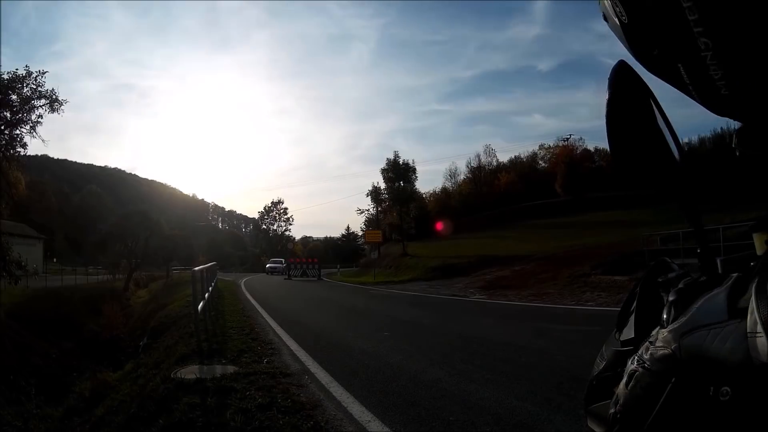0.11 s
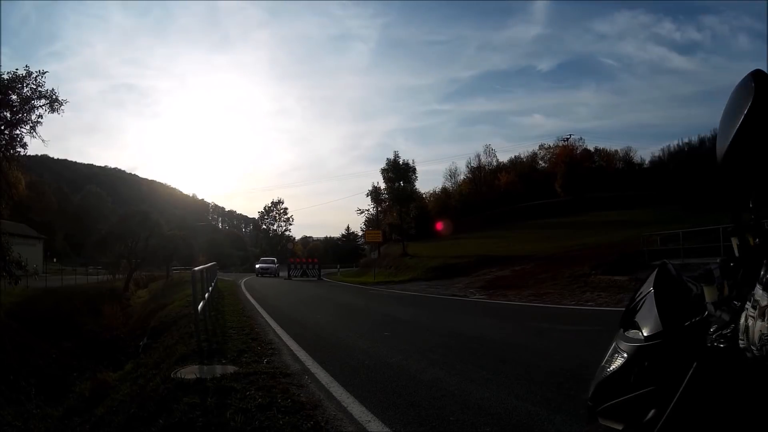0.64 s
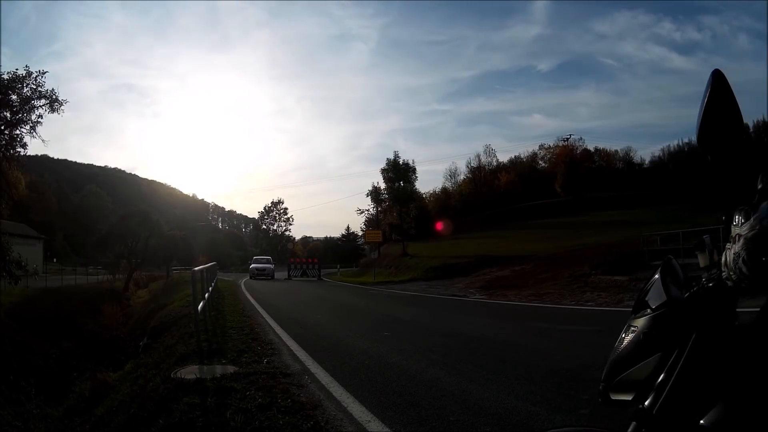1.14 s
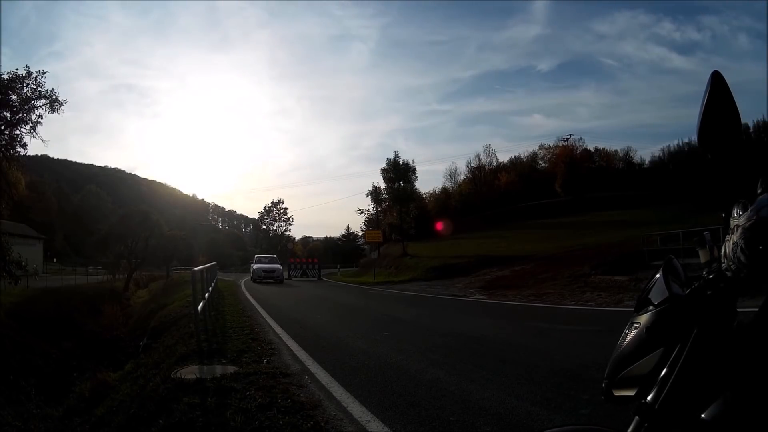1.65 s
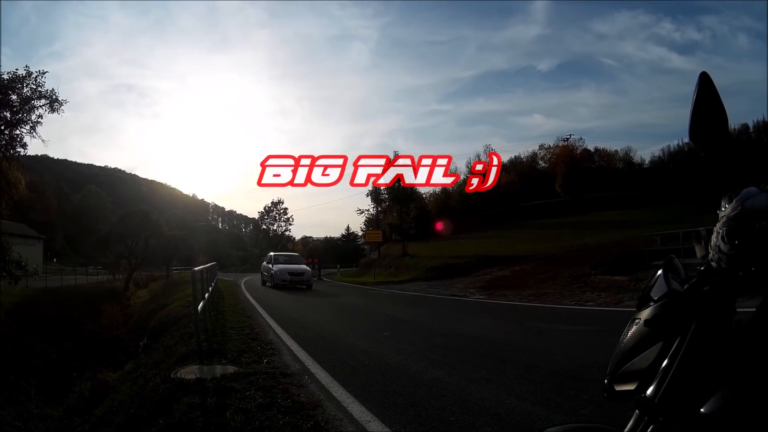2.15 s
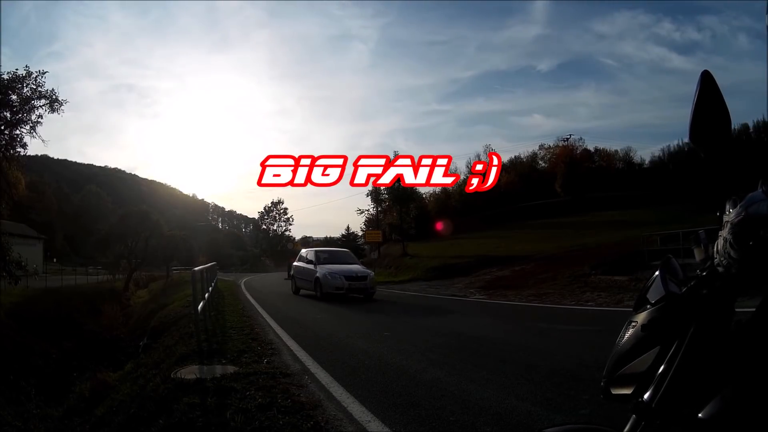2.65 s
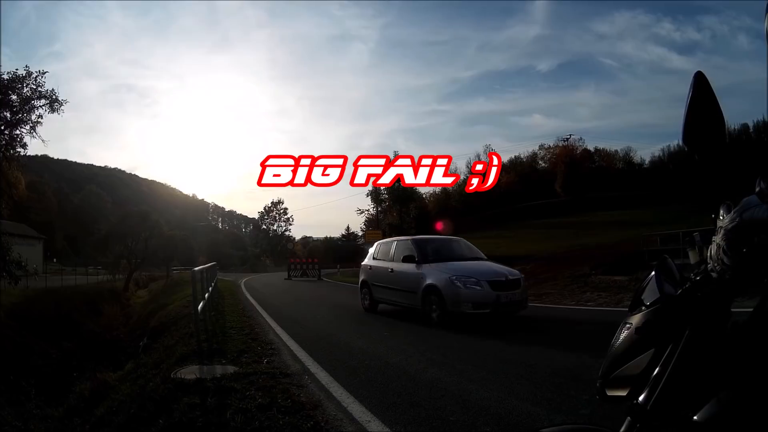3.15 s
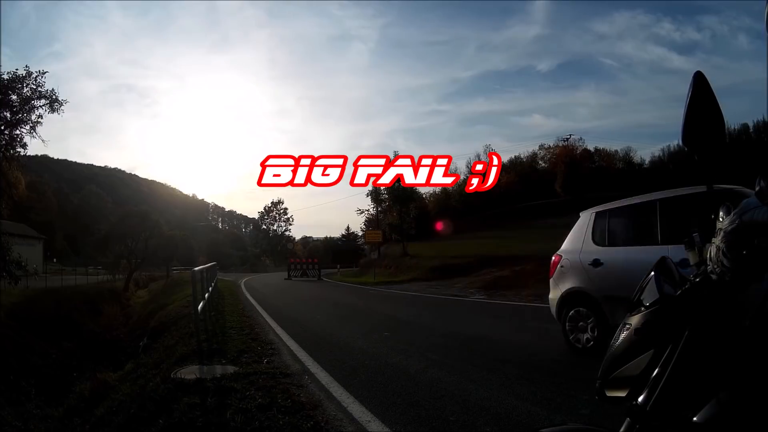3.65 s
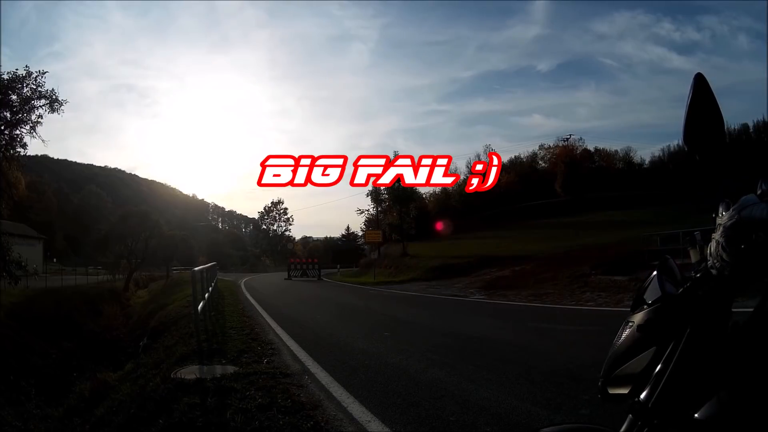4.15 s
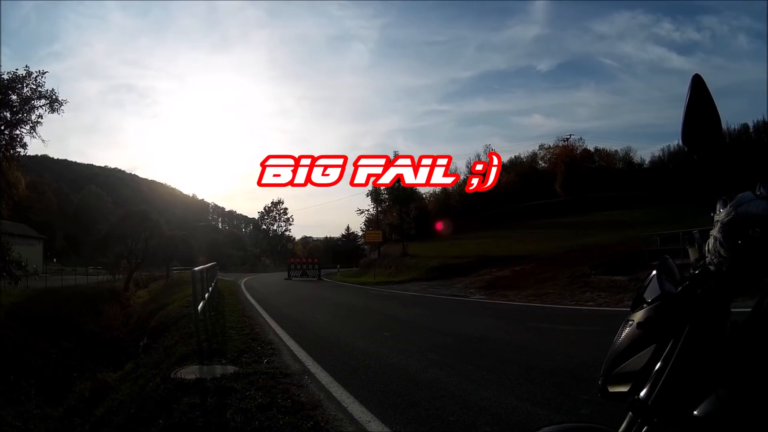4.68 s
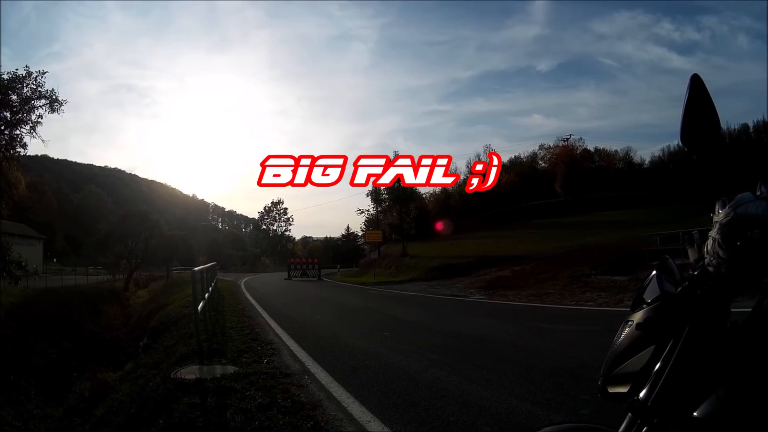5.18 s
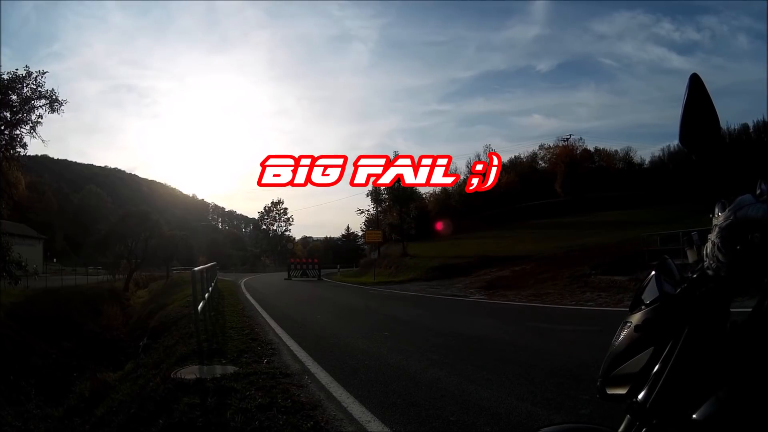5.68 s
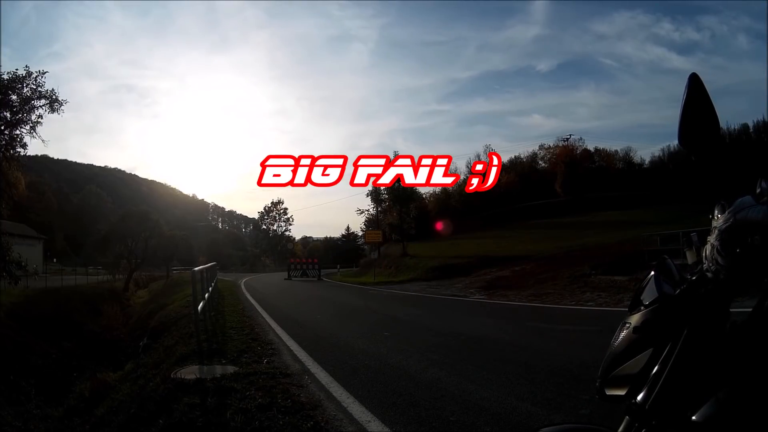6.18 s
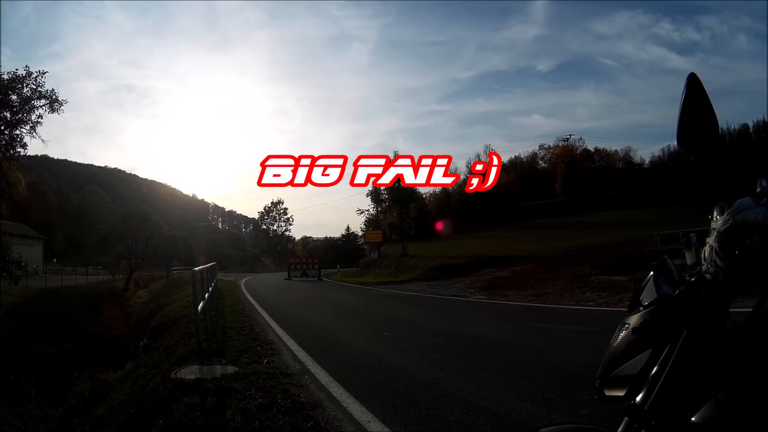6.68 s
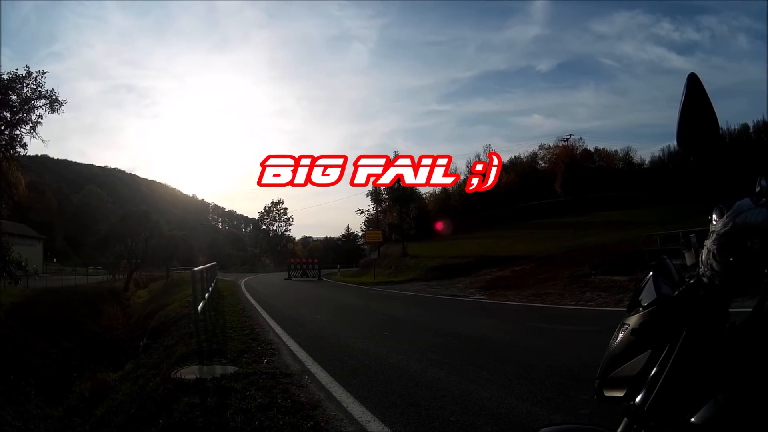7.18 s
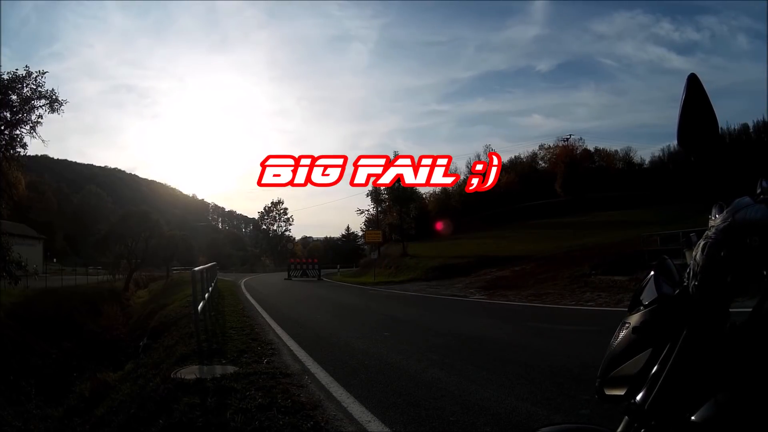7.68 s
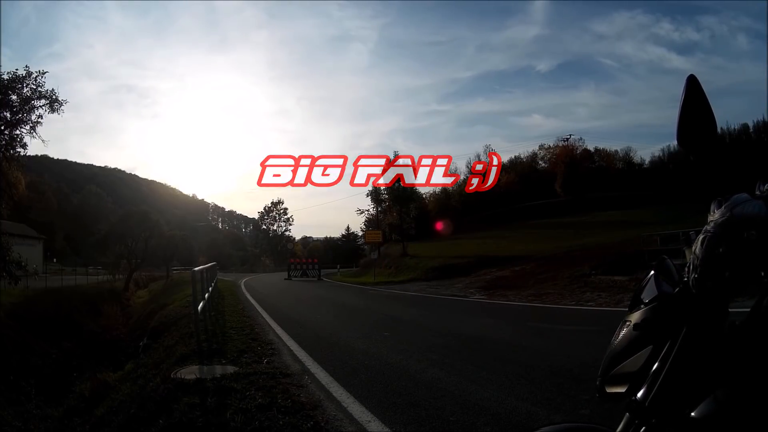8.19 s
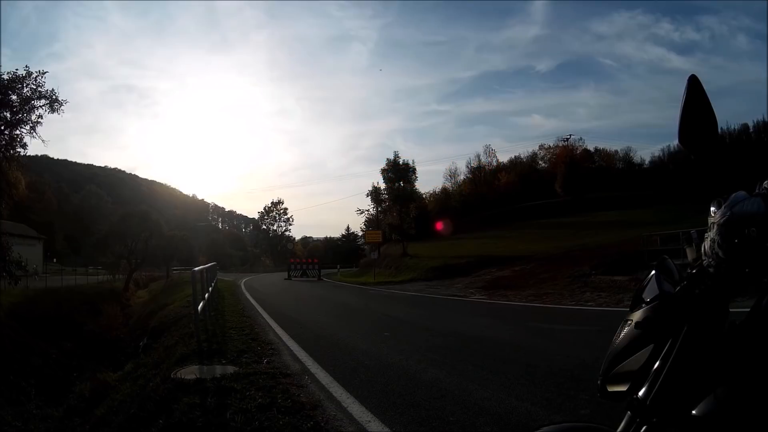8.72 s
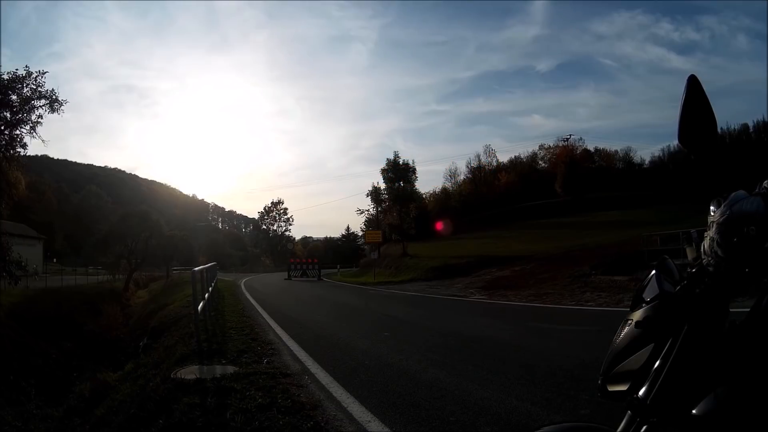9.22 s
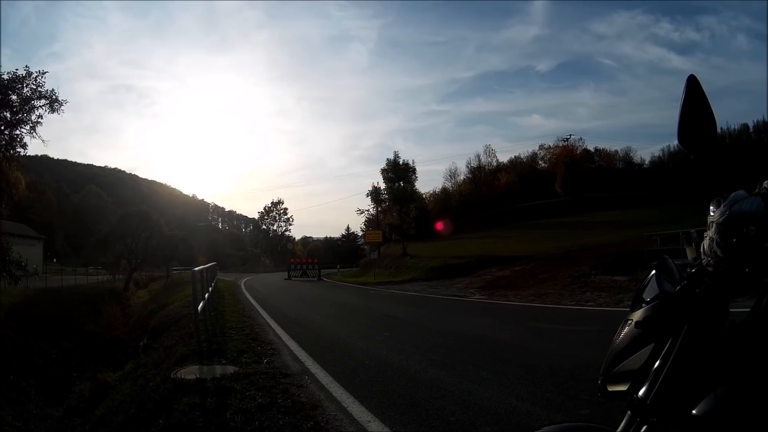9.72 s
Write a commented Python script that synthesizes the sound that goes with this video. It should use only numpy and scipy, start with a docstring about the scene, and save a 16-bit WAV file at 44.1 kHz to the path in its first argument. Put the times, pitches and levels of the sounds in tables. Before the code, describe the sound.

Lumpy four-cylinder bike idle dies with a hard metallic clunk, a car whooshes by, another clunk, then two laboured bursts of starter cranking.

```python
"""A four-cylinder motorcycle idles with misfires, each firing ringing the pipe under valve clatter, then stalls.
Gearbox blows ring metal modes over noise cracks as it clunks into gear and is kicked back.
The starter, pressed twice, grinds its teeth into the casing on each compression and coasts between; air chuffs
down the pipe, and one firing catches. A car passes in tyre noise and engine orders over far traffic and air.
The camera on the bike adds hiss and a thin whine, and rounds off the hardest blows."""
import sys
import numpy as np
from scipy import signal
from scipy.fft import rfft, irfft
from scipy.io import wavfile
from scipy.ndimage import uniform_filter1d

SR = 44100
rng = np.random.default_rng(int(sys.argv[2]) if len(sys.argv) > 2 else 0)


def dump_mix(stems):
    """Bounce the given channels to the path in sys.argv[1] as a 16-bit WAV at rate SR."""
    frames = np.atleast_2d(stems).T  # one column per channel
    limited = np.clip(frames, -1, 1)  # hard clip at full scale
    pcm = np.round(limited * 32767).astype(np.int16)
    wavfile.write(sys.argv[1], SR, pcm)


def gain_from_decibels(decibels):
    """Convert decibel values to linear amplitude factors."""
    exponent = np.asarray(decibels, float) / 20
    return 10 ** exponent


N = 433944
T = np.arange(N) / SR


def noise():
    """White noise of the scene's length."""
    return rng.standard_normal(N)


def curve(rows):
    """Columns of a table as sample-rate curves."""
    s, *columns = np.transpose(rows)
    return [np.interp(T, s, c) for c in columns]


def unit(x):
    """Scale to rms 1."""
    return x / np.sqrt(np.mean(x ** 2))


def colour(x, points):
    """Shape a spectrum by (frequency [Hz], gain [dB]) points."""
    hz, db = np.transpose(points)
    f = np.maximum(np.fft.rfftfreq(len(x), 1 / SR), 1)
    gain = gain_from_decibels(np.interp(np.log(f), np.log(hz), db))
    return irfft(rfft(x) * gain, len(x))


def ring(x, modes):
    """Sum of decaying modes struck by x; neighbouring modes move in opposite sense."""
    out = 0
    for k, (hz, db, t60) in enumerate(modes):
        pole = np.exp(2j * np.pi * hz / SR - np.log(1000) / (t60 * SR))
        out = out + (-1) ** k * gain_from_decibels(db) * signal.lfilter([1], [1, -pole], x).imag
    return out


def sliding(x, hz, width):
    """A mode of the given width [Hz] whose pitch is a curve [Hz]."""
    turn = np.exp(2j * np.pi * np.cumsum(hz) / SR)
    return (turn * signal.lfilter([width], [1, -np.exp(-2.7 * width / SR)], x / turn)).imag


def walk(rate):
    """Smooth random wander of spread 1, with a new target level rate times a second."""
    k = int(SR / rate)
    levels = rng.standard_normal(4096)
    steps = levels[np.arange(N) // k]
    return unit(uniform_filter1d(uniform_filter1d(steps, k), k))


def push(x, seconds):
    """Soften clicks to a push of the given length."""
    return signal.fftconvolve(x, np.hanning(int(seconds * SR) + 3))[:len(x)]


# spectrum of the far bed: (frequency [Hz], gain [dB])
VALLEY_SPECTRUM = [(25, -10), (90, 1), (130, -6.5), (260, -2.5), (430, -8), (700, -9.5), (1200, -6),
                   (2320, -17.5), (3200, -29.5), (4500, -37)]
# its loudness: (time [s], level [dB])
VALLEY_LEVEL = [(7.3, -53), (7.85, -53), (8.1, -54), (8.62, -58)]


def valley():
    """Far traffic and air: coloured noise with a slow wander in level."""
    return gain_from_decibels(curve(VALLEY_LEVEL)[0] + 0.71 * walk(5)) * unit(colour(noise(), VALLEY_SPECTRUM))


# tyre roar spectrum: (frequency [Hz], gain [dB per Hz])
TYRE_SPECTRUM = [(70, -14), (170, -13), (270, -4), (430, -4), (850, -3), (1200, 0.5), (1700, -4.5),
                 (2320, -10.5), (2800, -18), (3200, -24), (3650, -30), (4800, -56), (6200, -64)]
# tyre roar as the car passes: (time [s], level [dB], treble tilt [dB per octave])
CAR_PASS = [(0, -54, 13), (2.1, -38, -0.5), (2.6, -34.5, 0), (2.9, -32.5, 0), (3.17, -30, .5),
            (3.36, -29, 0), (3.58, -29.5, -0.5), (3.81, -34.5, -3.5), (4.05, -31.5, -1),
            (4.33, -31.5, -0.5), (4.62, -33.5, -1), (5.14, -45.5, -2), (5.6, -37.5, 4.5), (7.3, -69, -7)]


def tyre_roar():
    """Six overlapping octaves of road noise, tilted about 1 kHz as the car's angle changes."""
    level_db, tilt_db = curve(CAR_PASS)
    scale, roar = colour(noise(), TYRE_SPECTRUM).std(), 0
    for hz in 100 * 2. ** np.arange(6):
        octave = [(hz / 4, -40), (hz / 2, -9), (hz / 1.4, -3), (hz, -1),
                  (hz * 1.4, -3), (hz * 2, -9), (hz * 4, -40)]
        band = colour(colour(noise(), TYRE_SPECTRUM), octave)
        roar = roar + gain_from_decibels(tilt_db * np.log2(hz / 1000) + 0.1 * walk(4.4)) * band / scale
    return gain_from_decibels(level_db) * roar


# air pumped in the tread grooves: (frequency [Hz], width [Hz], level [dB])
TREAD_MODES = [(1136, 160, -1.5), (1400, 87, -5)]
# tread notes against the roar: (time [s], level [dB])
TREAD_LEVEL = [(2.1, -5.5), (2.8, -4.5), (3.5, -5.5), (3.8, -12), (4.2, -17), (4.7, -14)]


def tread_notes():
    """Air pumped in the tread grooves: noise rings two modes that flicker apart."""
    out = 0
    for hz, width, db in TREAD_MODES:
        band = unit(ring(push(noise(), 0.00036), [(hz, 0, 4.0 / width)]))
        out = out + gain_from_decibels(db + curve(TREAD_LEVEL)[0] + 3.2 * walk(9.8)) * band
    return gain_from_decibels(curve(CAR_PASS)[0]) * out


# car engine's lowest order, gathering speed when past: (time [s], frequency [Hz])
CAR_ENGINE_HZ = [(4, 34.7), (5, 35.9), (6, 36.5)]
# orders 1-3: (loudest time [s], level [dB], rise [dB per s], fall [dB per s])
ENGINE_ORDERS = [(3.8, -47, 7, 30), (4, -40.5, 36, 18), (3.9, -42, 16, 8.2)]


def car_engine():
    """The three lowest engine orders as sines, each swelling to its own peak."""
    phase = 2 * np.pi * np.cumsum(curve(CAR_ENGINE_HZ)[0]) / SR
    hum = 0
    for order, (s, db, rise, fall) in enumerate(ENGINE_ORDERS, 1):
        level_db = db + np.minimum(rise * (T - s), fall * (s - T)) + 1.1 * walk(9.2)
        hum = hum + np.sqrt(2) * gain_from_decibels(level_db) * np.sin(order * phase)
    return hum


# thin top of the tyre noise: (frequency [Hz], gain [dB per Hz])
SIZZLE_SPECTRUM = [(3000, -24), (3700, -0.5), (4050, 2.5), (4700, -14), (6200, -26)]
# brighter top heard from behind the car: (frequency [Hz], gain [dB per Hz])
WAKE_SPECTRUM = [(3300, -20), (4200, -2), (5300, 0), (5900, -12.5), (7000, -29)]
# the two tops: (time [s], sizzle level [dB], wake level [dB])
SIZZLE_LEVELS = [(1.5, -90, -95), (2.15, -67, -83), (2.83, -65.5, -80), (3.45, -56, -69), (3.8, -66, -77),
                 (4, -72, -66.5), (4.35, -70, -72), (5.2, -90.5, -88)]


def car():
    """The passing car: tyre roar, tread notes, engine orders and two thin bands of tyre treble."""
    sizzle_db, wake_db = curve(SIZZLE_LEVELS)
    sizzle = gain_from_decibels(sizzle_db) * unit(colour(noise(), SIZZLE_SPECTRUM))
    wake = gain_from_decibels(wake_db) * unit(colour(noise(), WAKE_SPECTRUM))
    return tyre_roar() + tread_notes() + car_engine() + sizzle + wake


# starter under load, one row a compression:
# (time [s], take-up level [dB], length [s], level of air pushed down the pipe [dB])
LOADS_ROWS = [(5.189, -31.5, .065, -66), (5.256, -27, .2, -43), (5.51, -23, .095, -41),
              (5.659, -22, .085, -43), (5.795, -24.5, .095, -40), (5.946, -23, .1, -46),
              (6.111, -23.5, .09, -49), (6.258, -24.5, .085, -53), (6.406, -24, .1, -46),
              (6.565, -23, .108, -37), (6.728, -24, .103, -44), (6.88, -22, .068, -36),
              (6.977, -35.5, .06, -64.5), (8.691, -29.5, .065, -62), (8.795, -23, 0.11, -51),
              (8.898, -30.5, .065, -46.5), (9.023, -29, .095, -45), (9.177, -27.5, .08, -43),
              (9.318, -25, 0.095, -41), (9.468, -29.5, .11, -42), (9.692, -22.5, .06, -37),
              (9.807, -24.5, 0.18, -52)]
# exhaust pipe modes: (frequency [Hz], level [dB], t60 [s])
PIPE_MODES = [(46.2, -6.5, 0.31), (94.8, 4.5, 0.21), (166.7, 4.5, 0.02), (206, -8.5, 0.15),
              (310, -29, 0.048)]


def chuffs():
    """Unburnt air, pushed out slowly on each load, rings the pipe softly."""
    s, _, length, db = np.transpose(LOADS_ROWS)
    leaves_s = s + 0.37 * length  # share of the load that passes before the air leaves
    air = np.zeros(N)
    air[np.minimum(leaves_s * SR, N - 1).astype(int)] = gain_from_decibels(db)
    out = ring(push(air, 0.013), PIPE_MODES)
    return out * air.max() / abs(out).max()


# starter button: (time down [s], time up [s], free-spin drive level [dB])
BUTTON_PRESSES = [(5.148, 7.05, -39), (8.647, 10, -41.5)]


def presses():
    """Level of the starter's free spin: the pinion slams in, holds, then falls to a whirr that stops."""
    engage_s, engage_db, engage_fade_s = 0.018, 8, 0.045
    rundown_db_s, rundown_floor_db, rundown_s = 125, -18, 0.234
    out = np.zeros(N)
    for down, up, db in BUTTON_PRESSES:
        t, after = np.maximum(T - down, 0), np.maximum(T - up, 0)
        slam_db = engage_db * np.exp(-t / engage_fade_s)
        rundown_db = np.maximum(-rundown_db_s * after, rundown_floor_db)
        stop = np.clip((rundown_s - after) / 0.015 + 1, 0, 1)
        out += gain_from_decibels(db + slam_db + rundown_db) * np.minimum(t / engage_s, 1) ** 2 * stop
    return out


# first loads, whose teeth mesh evenly and sing: (start tooth rate [Hz], end tooth rate [Hz], end level [dB])
EVEN_LOADS = [(680, 668, -30), (825, 292, -24.5)]
# nominal tooth rate of the other loads: (start [Hz], end [Hz])
TOOTH_RATES = (588.7, 392.5)


def compressions():
    """Each load pulses once an armature turn while its tooth rate slides; backlash knocks at take-up."""
    armature_hz, throb_db, settled_db = 46.9, 2.5, -26.5
    load, fresh = np.zeros(N), np.zeros(N)
    rate, rough = np.full(N, 500.), np.full(N, .45)  # tooth rate [Hz], unevenness 0-1
    for k, (s, db, length, _) in enumerate(LOADS_ROWS):
        pace = 1 + .06 * rng.standard_normal()
        even = k < len(EVEN_LOADS)
        if even:
            start_hz, end_hz, end_db = EVEN_LOADS[k]
        else:
            start_hz, end_hz = pace * np.array(TOOTH_RATES)
            end_db = settled_db
        on = (T >= s) & (T - s < length + .03)
        t, change_db = T[on] - s, end_db - db
        release = np.clip((length + .018 - t) / .032, 0, 1) ** 1.5
        knock = 0.25 * gain_from_decibels(-2 * max(change_db, 0)) * np.exp(-t / 0.024)
        throb = throb_db * np.cos(2 * np.pi * armature_hz * pace * (t - .008))
        level = gain_from_decibels(db + change_db * t / length + throb)
        load[on] = level * np.clip(t / 0.00367, 0, 1) * (release + knock)
        fresh[on] = np.exp(-t / 0.013)  # metal flecks are thickest at take-up
        rate[on] = start_hz + (end_hz - start_hz) * t / length
        rough[on] = .06 if even else .12
    return load, fresh, rate, rough


# brush note: (free-running frequency [Hz], share lost under load, then two harmonics against free spin [dB])
BRUSH_NOTE = (2000, .07, -11, -17)
# brush note grows clearer late in the second press: (time [s], gain [dB])
BRUSH_GAIN = [(7, 0), (9.1, 5), (9.55, 14)]


def brushes(load, coast):
    """The brushes sing a thin note that sags under load and climbs back when the motor runs free."""
    free_hz, lost, first_db, second_db = BRUSH_NOTE
    strain = np.clip(load / np.median(load[load > 0]), 0, 1)
    k = 1 / (.05 * SR)
    sag = signal.lfilter([k], [1, k - 1], strain)
    phase = 2 * np.pi * np.cumsum(free_hz * (1 - lost * sag + .002 * walk(60))) / SR
    note = gain_from_decibels(first_db) * np.sin(phase) + gain_from_decibels(second_db) * np.sin(2 * phase)
    return coast ** 2 / coast.max() * gain_from_decibels(curve(BRUSH_GAIN)[0] + 4.3 * walk(28)) * note


# short metal contact of a tooth: (frequency [Hz], gain [dB])
TOOTH_SPECTRUM = [(300, -41), (700, -13), (1400, -26.5), (2000, -2.5), (3000, -2), (16000, 6.5)]
# starter casing modes: (frequency [Hz], width [Hz], level [dB])
CASING_MODES = [(725, 71, 0.5), (1168, 60, -1.5), (1353, 47, -5.5), (1560, 114, -3), (1948, 73, 2),
                (2175, 127, -4), (2362, 68, 4), (2684, 160, -11.5), (3530, 50, -15), (3740, 120, -19),
                (4800, 89, -15.5), (5390, 120, -27.5), (7650, 170, -44.5)]
# grinding noise: (frequency [Hz], gain [dB per Hz])
GRIND_SPECTRUM = [(25, -7), (60, -16), (170, -14.5), (260, -4.5), (700, -0.5), (1300, 0), (2400, -11.5),
                  (2800, -9.5), (3200, -17.5), (4000, -17), (5000, -18.5), (5900, -35), (7000, -47.5),
                  (9000, -42.5), (12000, -50), (15500, -62)]
# chips of metal contact: (frequency [Hz], gain [dB per Hz])
FLECK_SPECTRUM = [(4500, -24), (6000, -10.5), (7500, 5), (8300, 2), (11000, -3.5), (15500, -28)]


def starter():
    """Gear teeth click into the casing, slowing through each load, with grind, metal flecks and brush note."""
    load, fresh, rate, rough = compressions()
    coast = presses()
    turns = np.cumsum(rate * (1 + .12 * rough * walk(300))) / SR
    clicks = np.diff(np.floor(turns), prepend=0) * gain_from_decibels(10 * rough * noise())
    teeth = unit(colour(clicks, TOOTH_SPECTRUM))
    loaded, free = gain_from_decibels(1.5 + 0.9 * walk(120)) * load, gain_from_decibels(2.2 * walk(45)) * coast

    def contact(free_gain):
        mesh = np.sqrt(1 - rough) * teeth + np.sqrt(rough) * noise()
        return loaded * mesh + free_gain * free * noise()

    force, rasp = contact(0.49), contact(1.31)
    chips = gain_from_decibels(6 * walk(400)) * noise() * (load * (0.068 + fresh) + free)
    casing = 0
    for k, (hz, width, db) in enumerate(CASING_MODES):
        # the point of contact moves and the strain changes, so each mode swells and slides alone
        struck = force * gain_from_decibels(1.8 * walk(14))
        casing = casing + (-1) ** k * gain_from_decibels(db) * sliding(struck, hz * (1 + .009 * walk(18)), width)
    # steady noise through the same colours sets the scale of each part
    probe = noise()
    still_modes = [(hz, db + 20 * np.log10(width), 1.85 / width) for hz, width, db in CASING_MODES]
    casing = gain_from_decibels(2.5) * casing / ring(probe, still_modes).std()
    grind = gain_from_decibels(-1.0) * colour(rasp, GRIND_SPECTRUM) / colour(probe, GRIND_SPECTRUM).std()
    flecks = gain_from_decibels(-36) * colour(chips, FLECK_SPECTRUM) / colour(probe, FLECK_SPECTRUM).std()
    return brushes(load, coast) + flecks + casing + grind


# blows in the gearbox and small ticks of levers:
# (time [s], ring peak level [dB], loudest frequency [Hz], t60 [s], noise crack against the ring [dB])
BLOWS = [(1.558, -6, 1120, 0.077, -5), (1.574, -20.5, 1160, 0.13, 1.5), (1.823, -19.5, 4300, 0.066, 5),
         (1.834, -7.5, 1100, 0.027, 1), (1.838, -8, 522, 0.034, -3), (1.862, -25, 900, .037, 6),
         (1.886, -16, 577, 0.055, -2), (1.893, -29, 1500, 0.02, 9), (1.916, -30, 900, 0.062, 3),
         (1.95, -27, 2400, 0.033, 5), (1.954, -20.5, 1220, 0.04, 1), (1.964, -25.5, 1000, 0.034, -8.5),
         (1.991, -23.5, 1900, 0.085, 0.5), (2.016, -24.5, 1130, 0.023, 5), (2.039, -34, 810, 0.028, 4),
         (2.068, -29.5, 670, 0.048, -1), (2.102, -46, 2400, 0.033, 7), (4.632, -6, 900, 0.075, -3),
         (4.639, -7.5, 1900, 0.019, -24), (4.677, -8, 1110, 0.036, -5.5), (4.681, -13, 1400, 0.067, -2),
         (4.695, -8.5, 1220, 0.058, -6.5), (4.718, -12.5, 1530, 0.032, -3.5),
         (4.723, -17.5, 775, 0.14, -12), (4.758, -23, 736, 0.03, -32.5), (7.714, -38, 1220, 0.028, -15),
         (7.76, -36.5, 950, 0.075, -7.5), (7.837, -43, 940, 0.062, -7), (7.899, -37, 900, 0.042, -14),
         (7.918, -48, 2400, 0.028, 0), (7.966, -42, 690, 0.18, -18), (8.118, -43.5, 1400, 0.12, 1),
         (8.289, -51.5, 1900, 0.11, 3.5), (8.356, -45, 1250, .026, -12)]
# gearbox modes: (frequency [Hz], level [dB], t60 [s])
GEARBOX_MODES = [(204, -1, 0.031), (389, 4, 0.014), (604, -6, 0.036), (732, -4.5, 0.046),
                 (900, -3.5, 0.028), (1139, -1.5, 0.019), (1260, -4, 0.032), (1400, -3, 0.025),
                 (1930, -3.5, 0.041), (2400, -19.5, 0.13), (3780, -27.5, .025), (4950, -30, .02),
                 (5430, -33, 0.014), (8100, -31, .025)]
# noise crack of a blow: (frequency [Hz], gain [dB per Hz])
CRACK_SPECTRUM = [(100, -19), (400, -3), (1200, -6), (2400, 0), (3200, -11), (4000, -7.5), (5400, -14.5),
                  (6500, -28.5), (9000, -27.5), (15500, -42)]


def clunks():
    """A short scrape rings the gearbox, most near the struck part, over a crack of noise."""
    out, t = np.zeros(N), T[:8192]
    for s, db, hz, t60, crack_db in BLOWS:
        scrape, crack = rng.standard_normal((2, len(t)))
        modes = [(f, g - 13.2 * abs(np.log2(f / hz)), d) for f, g, d in GEARBOX_MODES]
        # weaker blows crack duller above 6 kHz, harder ones brighter
        crack_colour = [(f, g + 0.2 * (db + 8) * (f > 6000)) for f, g in CRACK_SPECTRUM]
        fade = np.minimum(t / 0.00061, 1) * np.exp(-np.log(1000) * t / t60)
        body = ring(scrape * fade, modes)
        snap = colour(crack, crack_colour) * fade ** 1.1  # the crack dies sooner than the scrape
        i = int(s * SR)
        out[i:i + len(t)] += gain_from_decibels(db) * (body / abs(body).max() + gain_from_decibels(crack_db) * snap / abs(snap).max())
    return out


# crankshaft hunting around idle: (time [s], firing rate [firings per s])
IDLE_RATE = [(0.0, 36.6), (0.13, 38.4), (0.29, 41.2), (0.42, 39.8), (0.54, 39.7), (0.62, 38.6),
             (0.72, 40.9), (0.85, 41.1), (1.0, 40.0), (1.1, 41.2), (1.2, 40.5), (1.31, 41.2), (1.45, 40.0),
             (1.6, 38.6), (1.75, 40.4), (1.85, 41.8)]
FAILED_FIRINGS = [(.335, -5), (.411, -22), (.535, -4), (.611, -22), (.736, -8), (.932, -13), (1.007, -13),
                  (1.13, -15), (1.203, -7), (1.325, -12), (1.399, -24), (1.524, -12), (1.6, -16),
                  (1.728, -4)]
# strength of the four cylinders in turn: [dB]
CYLINDER_LEVELS = [-0.6, 0, -0.9, -0.7]


def firings():
    """One click a firing, its strength set by cylinder, chance and misfires."""
    turns = .33 + np.cumsum(curve(IDLE_RATE)[0]) / SR  # .33 of an interval is already turned
    count = turns.astype(int)
    at = np.flatnonzero(np.diff(count))[:90] + 1
    db = np.take(CYLINDER_LEVELS, count[at] % 4) + 0.9 * rng.standard_normal(len(at))
    for s, down_db in FAILED_FIRINGS:
        db[np.argmin(abs(T[at] + .009 - s))] += down_db
    late = (.0003 * SR * abs(rng.standard_normal(len(at)))).astype(int)  # the charge lights a little late
    pulses = np.zeros(N)
    pulses[at + late] = gain_from_decibels(db)
    return pulses


# valve gear and gas rattle: (frequency [Hz], gain [dB per Hz])
CLATTER_SPECTRUM = [(60, -57), (130, 4.5), (220, -2.5), (500, -5), (1400, -6.5), (2300, -14), (3200, -21),
                    (3900, -19.5), (4800, -27.5), (5900, -37), (7000, -45), (7750, -38.5), (10500, -46.5),
                    (15500, -55.5)]
# valve tick modes: (frequency [Hz], level [dB], t60 [s])
TAPPET_MODES = [(610, 0.5, 0.039), (900, 3.5, .03), (1330, 3, .035), (1518, 1.5, 0.031), (1924, -7.5, 0.03),
                (3800, -10, 0.045)]


def valve_gear(pulses):
    """Noise of valve gear and gas swells with each firing, sagging on a misfire, among random valve ticks."""
    puff = signal.lfilter([1], [1, -np.exp(-1 / (0.0046 * SR))], pulses ** 0.23)
    rattle = colour((1.0 + puff) * gain_from_decibels(1.5 * walk(150)) * noise(), CLATTER_SPECTRUM)
    ticks = (rng.random(N) < 160 / SR) * gain_from_decibels(3.5 * noise())  # about 160 a second
    return unit(rattle) + gain_from_decibels(-5) * unit(ring(ticks * noise(), TAPPET_MODES))


# a lone firing under the starter: (time [s], peak level before the gas crackle [dB])
LONE_FIRING = (9.624, -15)


def catch(clatter):
    """One charge burns in stages and rings low modes, with a fading crackle of gas."""
    s, db = LONE_FIRING
    kick = np.zeros(N)
    kick[int(s * SR) + (SR * np.array([-.006, 0, .006])).astype(int)] = [-.25, 1, -.6]
    modes = [(42.34, -14.5, 0.11), (91.5, -2, 0.15), (232, -3, 0.12), (150, -8, 0.05)]  # (Hz, dB, t60 s)
    thump = ring(push(kick, 0.0071), modes)
    since = T - s
    gas = gain_from_decibels(-16) * (since > 0) * np.exp(-abs(since) / 0.02) * clatter
    return gain_from_decibels(db) * (thump / abs(thump).max() + gas)


def engine():
    """Firings ring the pipe under valve clatter; both die at the stall, where the valve gear shudders once."""
    stall_s, shudder_s, shudder_db = 1.843, 0.023, 8
    pulses = firings()
    exhaust, clatter = ring(push(pulses, 0.002), PIPE_MODES), valve_gear(pulses)
    running = slice(0, int(1.8 * SR))
    exhaust, clatter = exhaust / exhaust[running].std(), clatter / clatter[running].std()
    stalled = np.maximum(T - stall_s, 0) ** 2
    shudder = shudder_db * np.exp(-((T - stall_s - shudder_s) / shudder_s) ** 2)
    exhaust_db = -27.5 - 1230 * stalled  # dB lost per second squared
    clatter_db = -31.5 + shudder - 370 * stalled
    return gain_from_decibels(exhaust_db) * exhaust + gain_from_decibels(clatter_db) * clatter + catch(clatter)


def scene():
    """All sources at one microphone."""
    return (valley() + car() + chuffs() + starter() + clunks() + engine())[None]


def roll_off(x):
    """The treble ends steeply here."""
    return signal.sosfilt(signal.butter(12, 15760, fs=SR, output="sos"), x)


# camera hiss: (frequency [Hz], gain [dB per Hz])
HISS_SPECTRUM = [(1000, -30), (4000, 8), (7000, 9.5), (12000, 3.5), (14500, -3.5), (15700, -20)]
# hiss drops after the second clunks, then slowly climbs: (time [s], level [dB])
HISS_LEVEL = [(4.5, -73), (5.1, -90), (9.84, -75.5)]
# camera electronics: (frequency [Hz], level [dB])
WHINE_TONES = [(11861, -90), (11907, -86), (11952, -91)]


def record(dry):
    """The camera adds hiss and a thin whine and softly clips the hardest blows."""
    clip = .5  # full scale is 1
    hiss = gain_from_decibels(curve(HISS_LEVEL)[0]) * unit(colour(noise(), HISS_SPECTRUM))
    whine = sum(gain_from_decibels(db + 2 * walk(6)) * np.sqrt(2) * np.sin(2 * np.pi * hz * T) for hz, db in WHINE_TONES)
    x = dry + hiss + whine
    mix = x / (1 + abs(x / clip) ** 6) ** (1 / 6)
    return roll_off(mix)


dry = scene()
out = record(dry)
dump_mix(out)
```